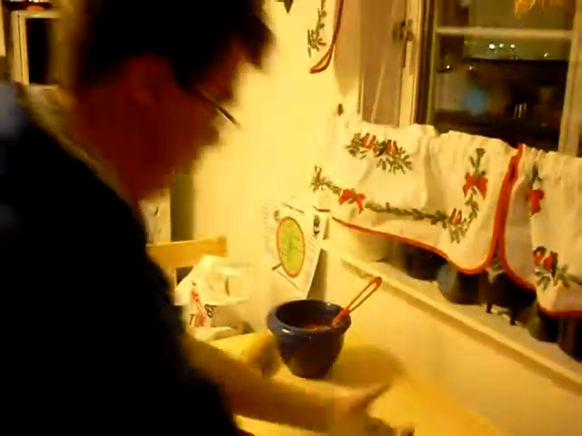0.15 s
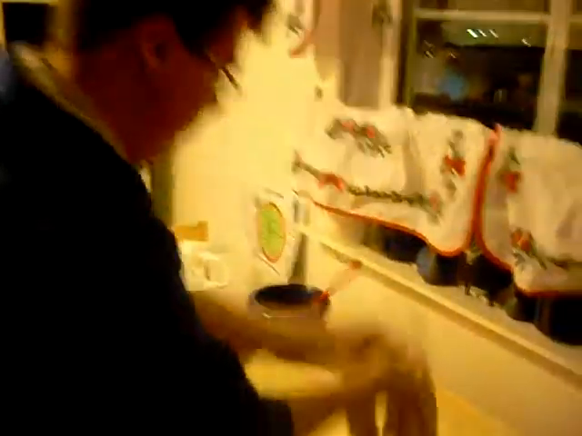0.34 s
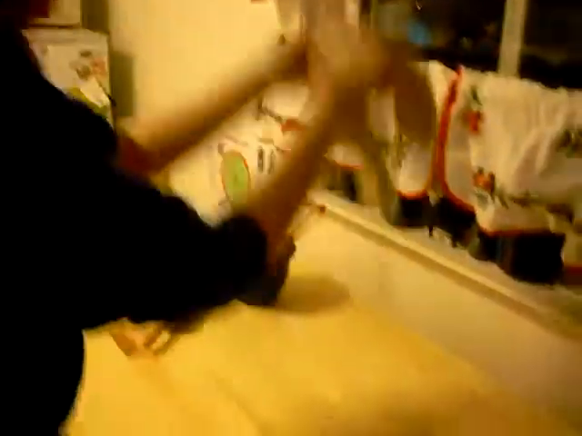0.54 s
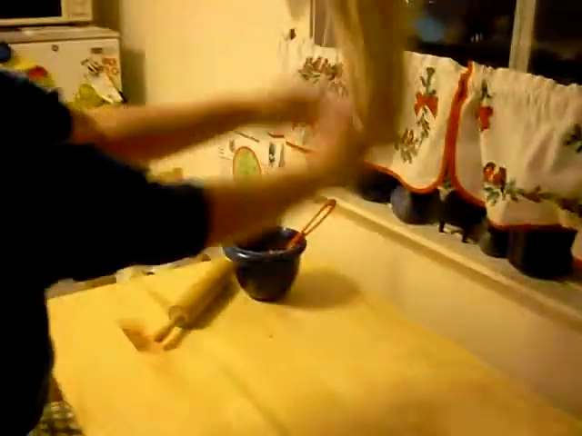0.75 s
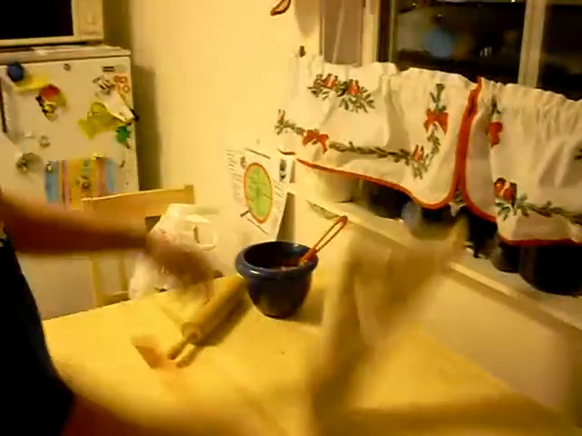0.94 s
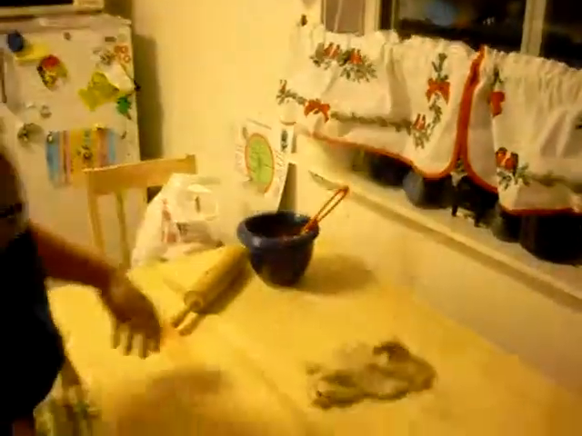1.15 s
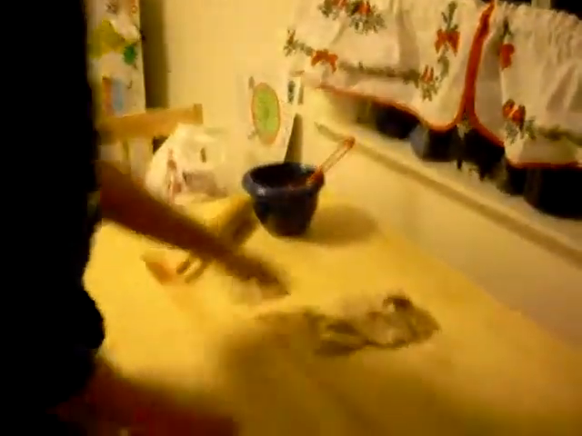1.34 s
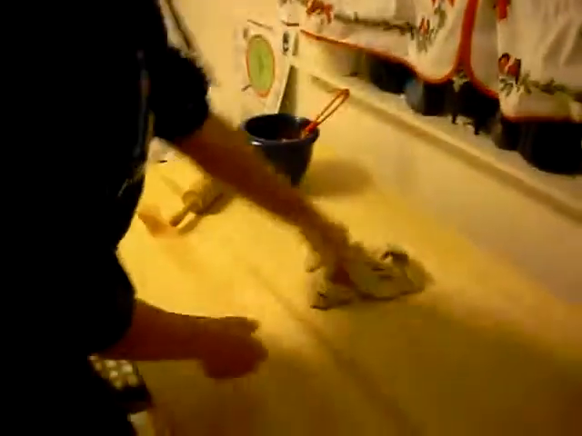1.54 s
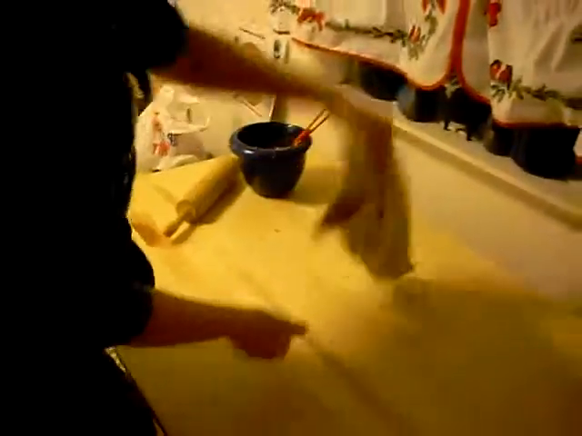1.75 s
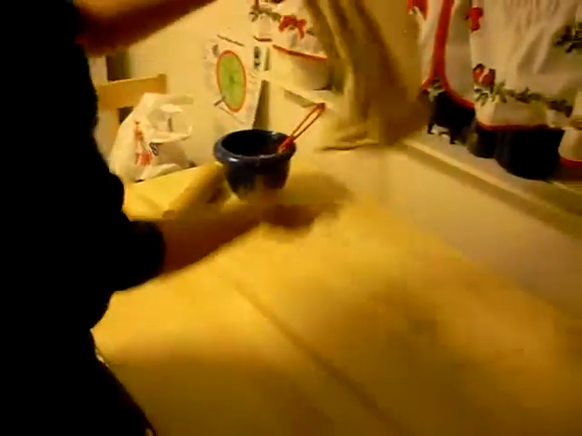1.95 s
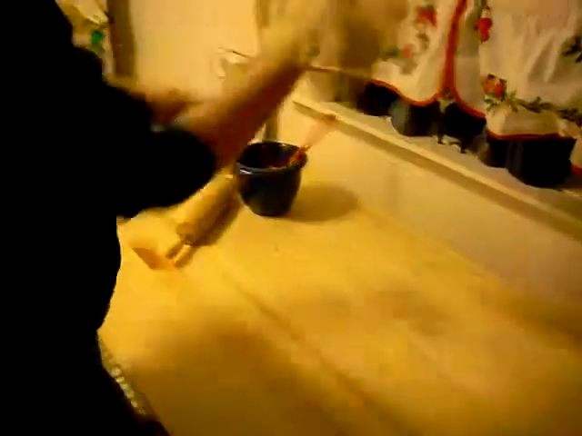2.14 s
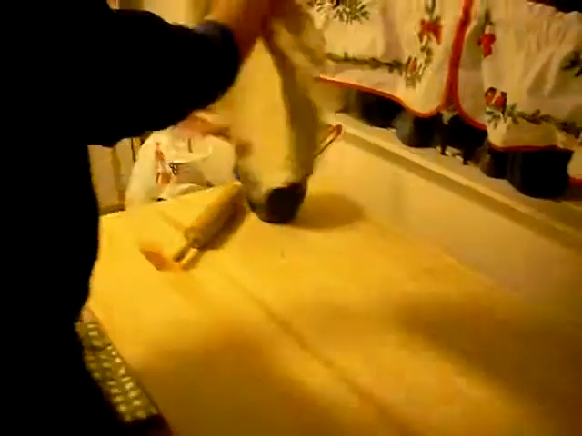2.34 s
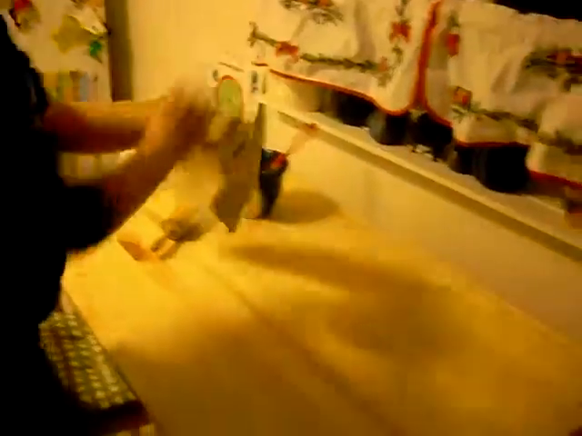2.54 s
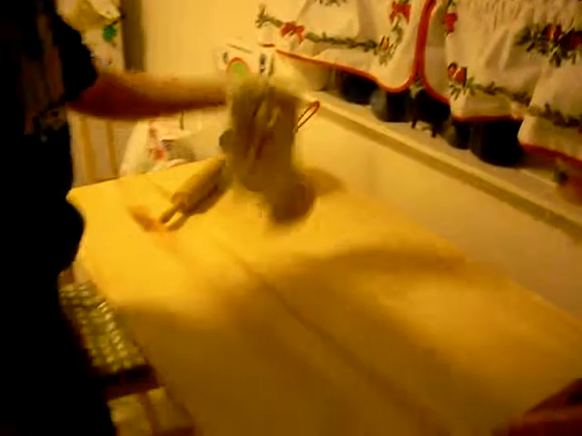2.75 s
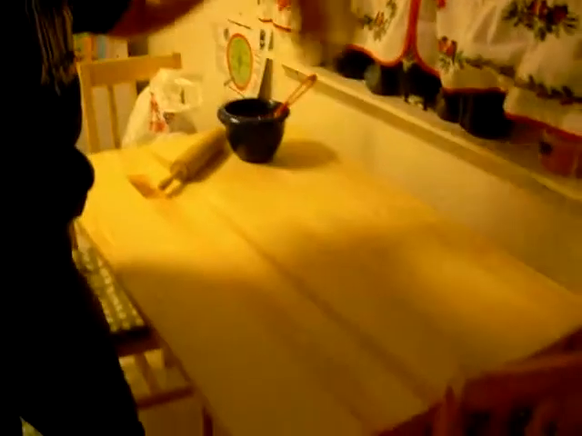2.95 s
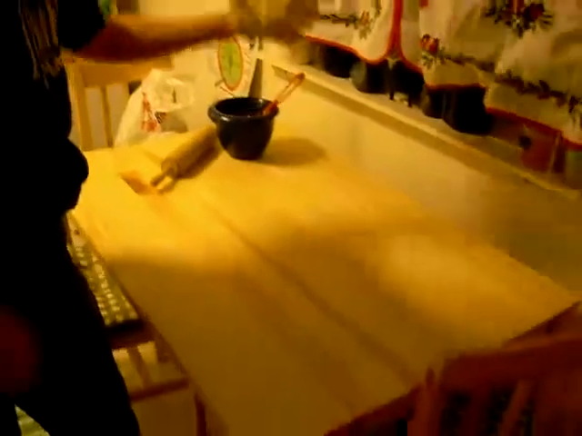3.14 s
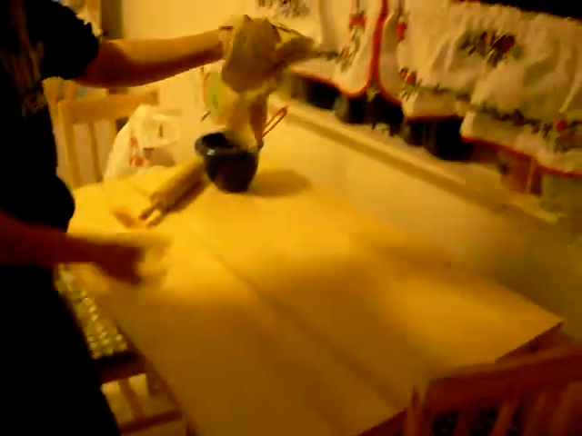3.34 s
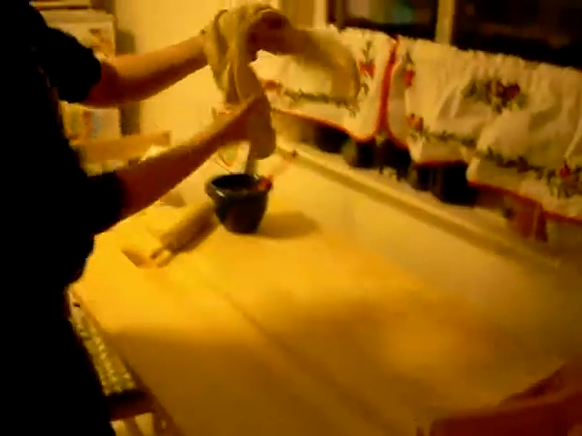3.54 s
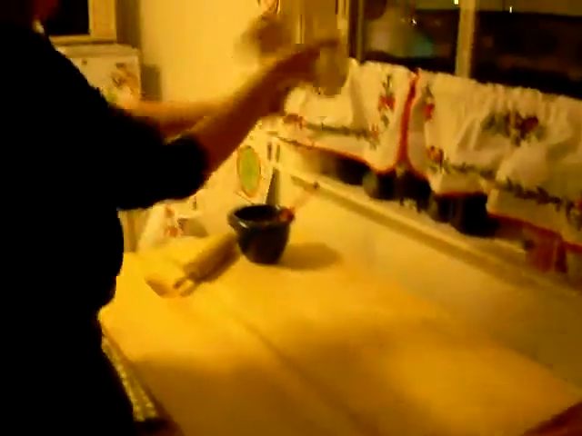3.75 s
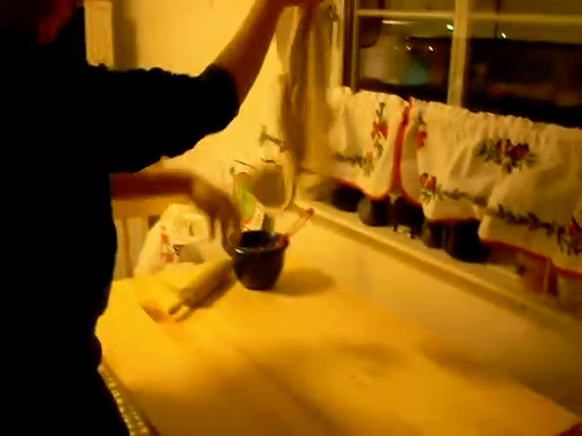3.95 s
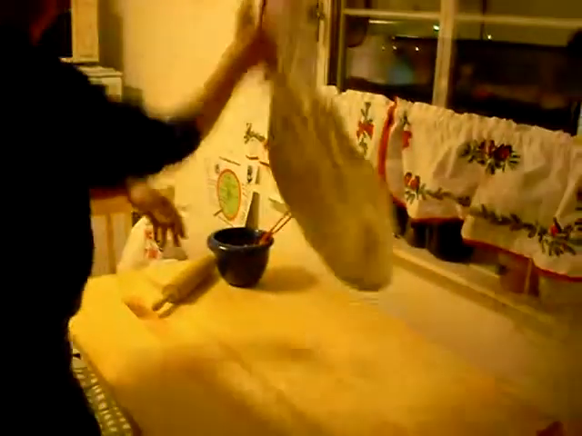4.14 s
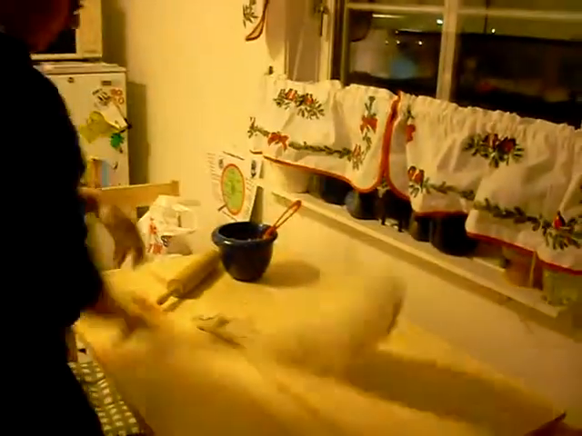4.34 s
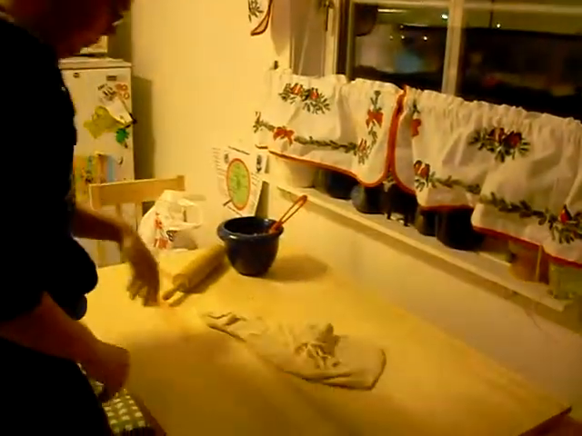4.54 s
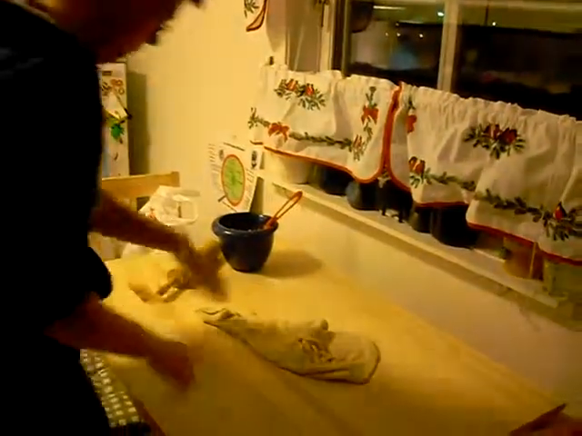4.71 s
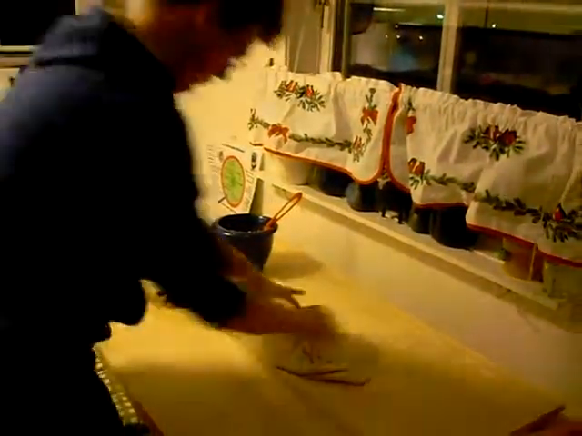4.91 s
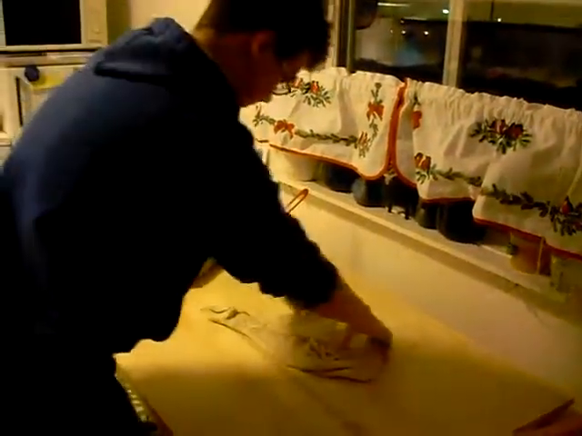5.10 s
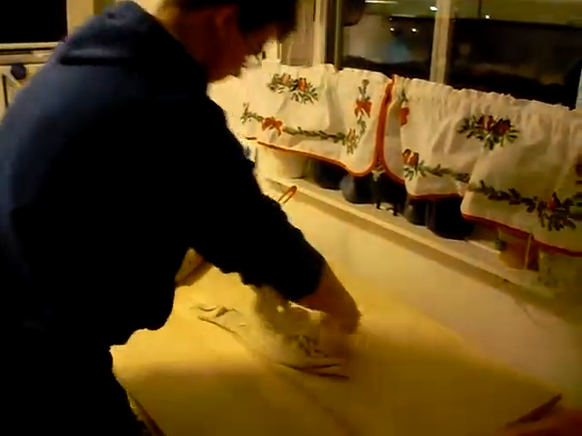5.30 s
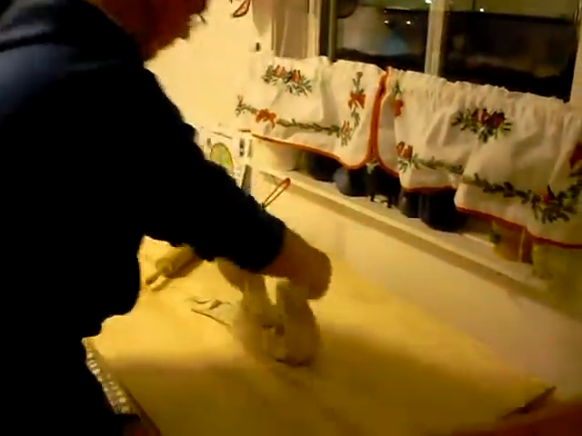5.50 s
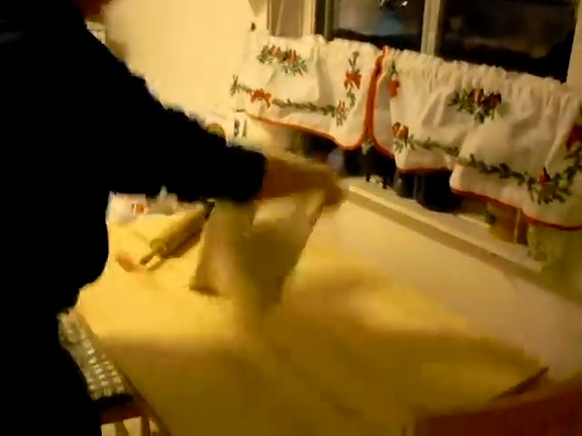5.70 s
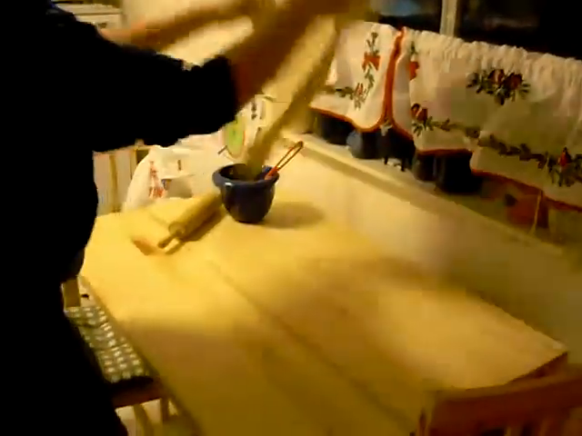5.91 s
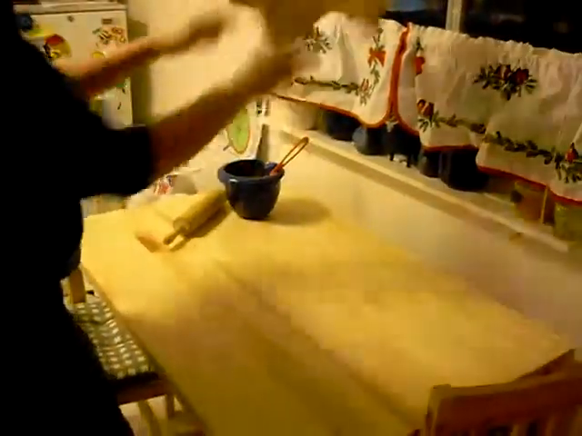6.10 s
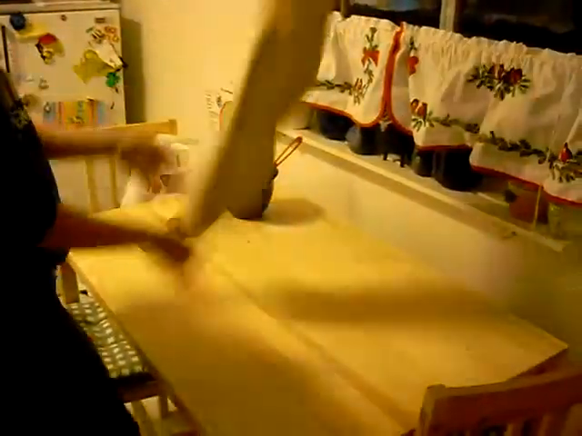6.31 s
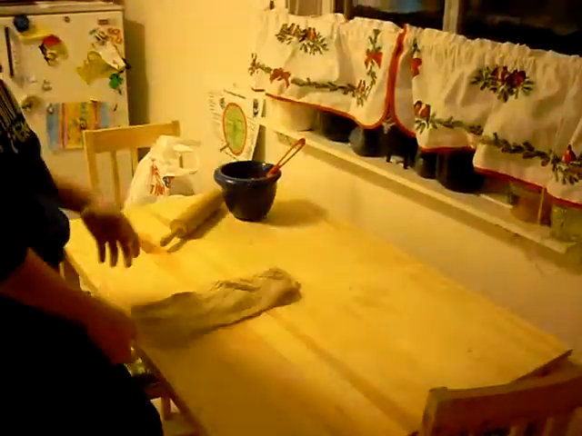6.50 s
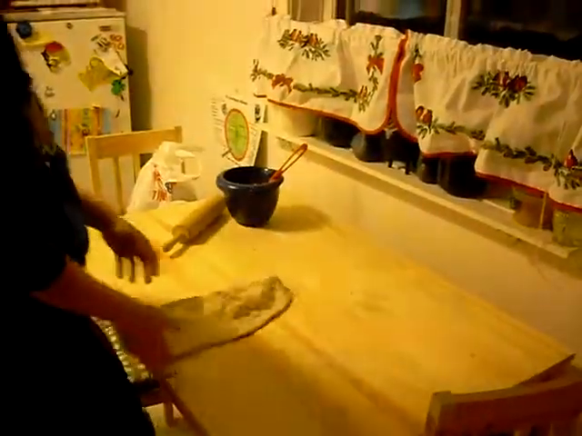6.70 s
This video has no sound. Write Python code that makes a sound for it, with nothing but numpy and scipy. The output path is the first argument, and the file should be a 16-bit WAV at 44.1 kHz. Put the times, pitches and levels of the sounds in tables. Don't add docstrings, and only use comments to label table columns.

```python
import sys
import numpy as np
from scipy import signal
from scipy.fft import rfft, irfft
from scipy.io import wavfile
from scipy.ndimage import uniform_filter1d

SR = 44100
rng = np.random.default_rng(int(sys.argv[2]) if len(sys.argv) > 2 else 0)


def ratio_of_db(decibels):
    return 10 ** (np.asarray(decibels, float) / 20)


def waveform_to_disk(signal):
    frames = np.transpose(np.atleast_2d(signal))
    scaled = np.clip(frames, -1, 1) * 32767
    samples = np.round(scaled).astype(np.int16)
    wavfile.write(sys.argv[1], SR, samples)


N = 298267

# (frequency [Hz], density [dB per Hz])
HISS_SPECTRUM = [(12, -53.5), (20, -3), (82, -13), (169, -14.5), (416, -11.5), (465, -15), (888, -16.5),
                 (1050, -17), (1390, -21), (1600, -21.5), (3330, -23), (15200, -30), (16500, -23)]
# (frequency [Hz], density [dB per Hz])
RUMBLE_SPECTRUM = [(12, -42), (20, -15.5), (97, -3), (172, -16.5), (286, -16.5), (397, -17.5), (471, -17),
                   (535, -20.5), (600, -39.5), (780, -51), (1320, -120)]
# (frequency [Hz], rms level [dB])
WHINE = [(15719, -87), (15741, -85)]
HISS_DB, RUMBLE_DB = -64.5, -63.5
RUMBLE_PERIOD_S, RUMBLE_START_S, RUMBLE_LENGTH_S = 16384 / SR, 0.189, 0.138

# (time [s], level [dB])
KNEADING = [(.4, -68.5), (.8, -72), (1.2, -57), (1.5, -99), (1.9, -69), (2.4, -64), (2.799, -62.5),
            (3.299, -62.5), (3.55, -69), (4.1, -70), (4.35, -67.5), (4.901, -70.5), (5.2, -72),
            (5.45, -71.5), (5.68, -71), (5.86, -70), (6.25, -68), (6.76, -81.5)]
# (time [s], hold [s], level [dB], airiness [dB])
SWISHES = [(0.251, 0.14, -53.5, 0.5), (.61, .01, -66.5, 2), (0.769, 0.036, -58.5, 1.5),
           (0.905, 0.021, -67, 6), (1.33, 0.048, -83, 8), (1.513, 0.077, -63.5, -3.5),
           (1.702, 0.081, -58, -1.5), (1.854, .03, -70.5, 5.5), (2.063, 0.015, -60, -8),
           (2.218, 0.011, -63.5, 9.5), (2.28, 0.025, -66.5, -7), (2.43, 0.014, -57, -1.5),
           (2.528, 0.07, -57.5, 1.5), (2.864, .01, -77, 8), (3.06, 0.09, -66, 0.5),
           (3.354, 0.043, -61, -2.5), (3.57, .01, -66.5, -3), (3.72, 0.012, -61.5, 0.5),
           (3.831, 0.062, -59, 1), (3.976, .04, -68, -2), (4.136, 0.011, -79, -8), (4.292, .02, -58, -1.5),
           (5.036, .01, -75, 7), (5.285, .025, -60, -3.5), (5.429, 0.036, -71.5, 3), (5.72, .1, -69.5, 0),
           (6.05, .05, -76, 4.5), (6.25, 0.0089, -72, 0.5)]
SWISH_RISE_DB_PER_S, SWISH_FALL_DB_PER_S, SWISH_DULL_DB = 172, 222.5, -13.5
# (time [s],
# hold [s], level [dB], brightness [dB], airiness [dB])
DRAGS = [(0.055, 0.038, -57.5, 10, 4), (0.11, 0.059, -56.5, -10, 2), (0.195, .04, -68, -8, -20),
         (.25, 0.022, -51, -18, -38), (2.177, 0.015, -53, -2.5, -14), (2.653, 0.023, -59, -5, 3.5),
         (2.733, .04, -58, -21, -25), (3.271, 0.025, -53.5, -3, -11), (4.45, 0.1, -63.5, 0.5, 4),
         (5.126, 0.057, -60.5, -0.5, 0), (6.459, 0.038, -41, -11.5, -16), (6.524, 0.01, -45, 7.5, -16),
         (6.571, 0.0017, -22.5, -5, -9.5), (6.614, 0.062, -47, -12, -36)]
DRAG_RISE_DB_PER_S, DRAG_FALL_DB_PER_S = 641, 555

# (time [s], smack [dB], thud [dB], body [dB], sizzle [dB])
BLOWS = [
    (0.037, -23.5, -37, -28, -27),
    (0.1468, -22, -99.5, -33.5, -23),
    (0.233, -35, -39.5, -31.5, -41),
    (0.984, -12.5, -30, -23.5, -24.5),
    (1.468, -66, -37, -52, -66),
    (2.642, -34, -47, -30.5, -42),
    (4.3635, 1, -19, -6, -12.5),
    (5.129, -48, -41, -33, -55),
    (6.426, -31, -46.5, -29.5, -36),
]
# (time [s], smack [dB], thud [dB], body [dB], sizzle [dB])
FLOPS = [(0.078, -31.5, -42.5, -44, -45), (0.11, -60, -73, -40, -46), (1.013, -37, -67, -24.5, -35.5),
         (1.044, -30, -35, -30, -41), (1.061, -37, -69, -50, -38.5), (1.085, -66, -42, -37.5, -44.5),
         (1.497, -61, -58, -53, -62), (2.138, -57.5, -56, -67, -65), (2.434, -44.5, -69, -56, -67),
         (2.707, -36, -81, -49, -42), (3.265, -44.5, -67, -59, -55.5), (5.1, -75, -67, -57, -75),
         (6.449, -47, -45, -73, -46), (6.485, -35.5, -49, -35, -51), (6.508, -25, -57, -57, -44),
         (6.52, -28, -41, -45, -39), (6.552, -24, -64, -42, -44), (6.564, -24, -48, -25, -48),
         (6.585, -39, -38.5, -27, -57), (6.609, -33.5, -64, -34.5, -61)]
# (time [s], smack [dB], thud [dB], body [dB], sizzle [dB])
SNAPS = [
    (.1492, -24.5, -70, -52, -14.5),
    (.4705, -44, -80, -64, -43),
    (.2325, -25, -88, -62, -44),
    (4.113, -42, -75, -58, -60),
    (6.46, -50.5, -80, -70, -36),
    (6.515, -32, -80, -60, -25.5),
    (6.523, -30, -73, -64, -35),
    (6.567, -42, -80, -60, -6.5),
    (6.572, -18, -70, -31, -34),
]
# (frequency [Hz], level [dB])
SPLAT_COLOUR = [(30, -12.5), (80, 4.5), (130, -7), (200, -9.5), (300, 5), (500, 2), (1000, -2.5),
                (1600, -6), (2500, -4), (5000, -2.5), (9000, -4.5), (15000, -19)]
DIRECT_DB = [
    [-3.5],
    [-6.5],
    [-2],
    [0.5],
]
BLOW_CONTACT_S, CONTACT_FOLLOWS = 0.017, 0.23
FLOP_SWELL_S, SNAP_S = 0.0043, 0.0012

# (frequency [Hz], level [dB], t60 [s])
TABLETOP_MODES = [(81.66, -1.5, 0.19), (149.6, 0.5, 0.4), (177.5, -0.5, 0.3), (216, -2, 0.4),
                  (251.4, -6.5, 0.3), (280.4, -4.5, 0.47), (320, -17, 0.15), (373, -8, 0.4),
                  (403, -7, 0.44), (467.4, -16, .25), (480.5, -11, .25), (566, -5, 0.3), (654, -12, 0.33),
                  (684, -9.5, 0.21), (781, -7, 0.51), (841, -7, 0.64), (933, -9.5, 0.21), (960, -13, 0.28)]
# (delay [s], level [dB])
ECHOES = [
    (.0052, -9),
    (0.0146, -7.5),
    (0.016, -15),
    (0.023, -12.5),
]
# (frequency [Hz], t60 [s])
ROOM_T60 = [(60, 0.16), (250, 0.63), (1000, 0.39), (3000, 0.37), (7000, 0.38), (14000, 0.32)]
# (frequency [Hz], level [dB])
ROOM_COLOUR = [(60, -10), (120, -11), (200, -12), (350, -16), (600, -4), (900, 0), (1500, 0), (2500, -2),
               (5000, -5), (9000, -9), (14000, -3)]
# (time [s], peak [dB], first pitch [Hz], settled pitch [Hz], t60 [s])
POPS = [(.1893, -30, 2200, 980, .055), (.4705, -49, 2200, 1300, .015), (2.1815, -36, 1700, 900, .028),
        (2.718, -33, 1500, 850, .035), (4.113, -48, 1500, 800, .008), (2.6432, -33, 600, 430, .03),
        (2.164, -46, 1500, 850, .03), (2.208, -47, 1000, 810, .04), (3.266, -47, 1300, 1060, .03),
        (3.282, -44, 1100, 800, .03), (6.512, -32, 1800, 1650, .05), (2.15, -54, 900, 800, .06),
        (4.469, -44, 6800, 6600, .015), (3.700, -53, 520, 465, .05), (1.470, -44, 260, 220, .05),
        (6.427, -35, 1500, 1250, .06), (5.132, -40, 480, 410, .04)]


def rms_one(x):
    return x / np.sqrt(np.mean(x ** 2) + 1e-20)


def at_hz(points, hz):
    table_hz, values = np.array(points)[:, :2].T
    return np.interp(np.log(np.maximum(hz, 1)), np.log(table_hz), values)


def coloured(x, spectrum):
    gain = ratio_of_db(at_hz(spectrum, np.fft.rfftfreq(len(x), 1 / SR)))
    return irfft(rfft(x) * gain, len(x))


def band(x, low_hz, high_hz):
    sos = signal.butter(2, [low_hz, high_hz], "band", fs=SR, output="sos")
    return signal.sosfilt(sos, x + 1e-18) * np.sqrt(SR / 2 / (high_hz - low_hz))


def ring(x, hz, t60):
    r = ratio_of_db(-60 / (t60 * SR))
    w = 2 * np.pi * hz / SR
    return signal.lfilter([0, np.sin(w)], [1, -2 * r * np.cos(w), r * r], x + 1e-18)


def recorder_noise():
    t = np.arange(N) / SR
    hiss = ratio_of_db(HISS_DB) * rms_one(coloured(rng.standard_normal(N), HISS_SPECTRUM))
    whine = sum(ratio_of_db(db) * np.sqrt(2) * np.sin(2 * np.pi * hz * t) for hz, db in WHINE)
    rumble = coloured(rng.standard_normal(N), RUMBLE_SPECTRUM)
    even_rumble = rumble / np.sqrt(uniform_filter1d(rumble ** 2, size=900))
    switched_on = (t - RUMBLE_START_S) % RUMBLE_PERIOD_S < RUMBLE_LENGTH_S
    gate = uniform_filter1d(1.0 * switched_on, size=300)
    return hiss + whine + gate * ratio_of_db(RUMBLE_DB) * even_rumble


def stroke(s, hold_s, rise_db_per_s, fall_db_per_s):
    t = np.arange(N) / SR - s
    rise_db = np.minimum(rise_db_per_s * t, 0)
    fall_db = fall_db_per_s * np.maximum(t - hold_s, 0)
    return ratio_of_db(np.maximum(rise_db - fall_db, -120))


def movement():
    out = np.zeros((3, N))
    out[0] = ratio_of_db(np.interp(np.arange(N) / SR, *np.transpose(KNEADING)))
    for s, hold_s, db, airy_db in SWISHES:
        levels = ratio_of_db(db + np.array([[SWISH_DULL_DB], [0], [airy_db]]))
        out += levels * stroke(s, hold_s, SWISH_RISE_DB_PER_S, SWISH_FALL_DB_PER_S)
    for s, hold_s, db, bright_db, airy_db in DRAGS:
        levels = ratio_of_db(db + np.array([[0], [bright_db], [airy_db]]))
        out += levels * stroke(s, hold_s, DRAG_RISE_DB_PER_S, DRAG_FALL_DB_PER_S)
    return out


def rustle(grain_db, per_s):
    out, edges_hz = 0, [300, 1500, 5000, 14200]
    for strength, low_hz, high_hz in zip(movement(), edges_hz, edges_hz[1:]):
        strikes = rng.random(N) < per_s / SR
        heights = ratio_of_db(grain_db * np.minimum(rng.exponential(1, N), 4))
        grains = strikes * heights * rng.choice([-1, 1], N)
        friction = 0.18 * rms_one(grains) + rng.standard_normal(N)
        colour = band(band(friction, low_hz, high_hz), 0.4 * low_hz, min(0.99 * high_hz, 16000))
        out = out + ratio_of_db(-4.5) * strength * rms_one(colour)
    return out


def contacts(rows, contact_s, swell):
    t = np.arange(4000) / SR
    grains = rng.standard_normal((len(rows), 4, len(t)))
    bursts, pushes = np.zeros((2, 4, N + len(t)))
    for (s, smack_db, thud_db, body_db, sizzle_db), lasts_s, noise in zip(rows, contact_s, grains):
        levels_db = np.array([[thud_db], [body_db], [smack_db], [sizzle_db]]) - 3.5
        decay_s = lasts_s * np.array([[1.5], [1.0], [0.8], [0.6]])
        front = np.e * t / decay_s if swell else 1 - np.exp(-t / 0.00011)
        shape = ratio_of_db(levels_db) * front * np.exp(-t / decay_s)
        at = round(s * SR)
        bursts[:, at:at + len(t)] += ratio_of_db(np.array(DIRECT_DB)) * shape * noise
        total_push = np.sqrt(np.sum(shape ** 2, axis=1))
        pushes[:, at + np.argmax(shape[1])] += total_push * [1, -1, 1, -1]
    return np.array([bursts, pushes])[..., :N]


def blows():
    hardness_db = np.array(BLOWS)[:, 3]
    slaps = contacts(BLOWS, BLOW_CONTACT_S * ratio_of_db(CONTACT_FOLLOWS * hardness_db), swell=False)
    flops = contacts(FLOPS, np.full(len(FLOPS), FLOP_SWELL_S), swell=True)
    snaps = contacts(SNAPS, np.full(len(SNAPS), SNAP_S), swell=False)
    trains = slaps + flops + snaps
    edges_hz = [50, 200, 700, 2500, 15000]
    out = sum(band(trains[:, k], edges_hz[k], edges_hz[k + 1]) for k in range(4))
    colour = ratio_of_db(2 * at_hz(SPLAT_COLOUR, np.linspace(0, SR / 2, 1025)))
    taps = signal.minimum_phase(signal.firwin2(2049, np.linspace(0, 1, 1025), colour))
    return signal.fftconvolve(out, taps[None])[:, :N]


def tabletop(push):
    out = 0
    for k, (hz, db, t60) in enumerate(TABLETOP_MODES):
        out = out + ratio_of_db(db - 49.5) * ring(push, hz, min(t60, 0.38)) * (-1) ** k
    return out


def walls(x):
    dull = signal.lfilter([0.3], [1, -0.7], x)
    return sum(ratio_of_db(db) * np.pad(dull, (round(s * SR), 0))[:N] for s, db in ECHOES)


def kitchen(x):
    t = np.arange(SR) / SR
    edges_hz = 40 * 2 ** np.arange(0, 9, 0.5)
    white = rng.standard_normal((2, SR))
    tail = 0
    for k, (low_hz, high_hz) in enumerate(zip(edges_hz, edges_hz[1:])):
        hz = np.sqrt(low_hz * high_hz)
        fade = ratio_of_db(at_hz(ROOM_COLOUR, hz) - 60 * t / at_hz(ROOM_T60, hz))
        tail = tail + fade * band(white[k % 2], low_hz, high_hz) * np.sqrt((high_hz - low_hz) / SR)
    tail = tail * (1 - np.exp(-t / 0.004))
    return signal.fftconvolve(x, tail)[:N]


def pops():
    t, out = np.arange(5000) / SR, np.zeros(N + 5000)
    glide_s = 0.0015
    for s, db, first_hz, hz, t60 in POPS:
        turns = hz * t + (first_hz - hz) * glide_s * (1 - np.exp(-t / glide_s))
        at = round(s * SR)
        out[at:at + len(t)] += ratio_of_db(db - 60 * t / t60) * np.sin(2 * np.pi * turns)
    return out[:N]


def scene():
    splat, push = blows()
    air = pops()
    rub = rustle(grain_db=5.5, per_s=480.0)
    direct = splat + tabletop(push) + air + rub
    reflections = walls(splat + ratio_of_db(-6) * air)
    echo = ratio_of_db(-31) * kitchen(push + ratio_of_db(-4.0) * air)
    return (direct + reflections + echo)[None]


def band_limit(x):
    return signal.sosfilt(signal.butter(12, 17000, fs=SR, output="sos"), x)


def record(dry):
    overload = 0.39
    top_cut = signal.ellip(10, 0.3, 60, 15900, fs=SR, output="sos")
    sound, noise = signal.sosfilt(top_cut, [dry[0], recorder_noise()])
    flat = sound[None] / (1 + np.abs(sound[None] / overload) ** 8) ** (1 / 8)
    bass_cut = signal.butter(1, 18, "high", fs=SR, output="sos")
    mix = signal.sosfilt(bass_cut, flat) + noise
    return band_limit(mix)


dry = scene()
out = record(dry)
waveform_to_disk(out)
```